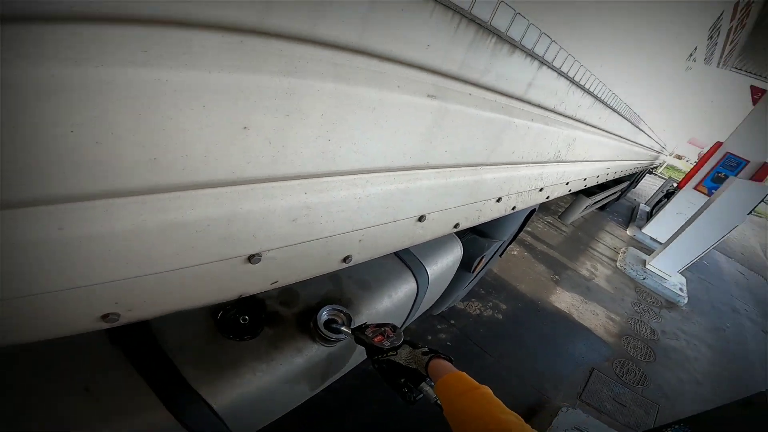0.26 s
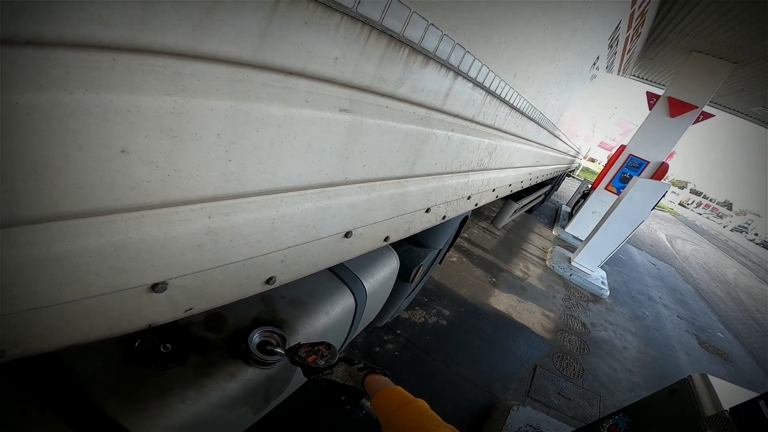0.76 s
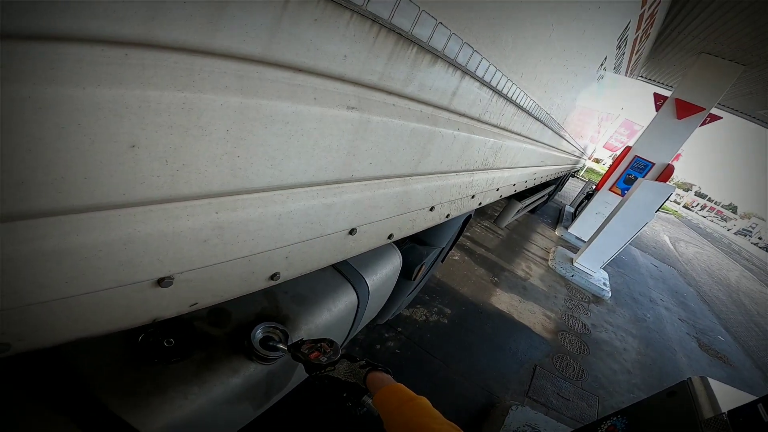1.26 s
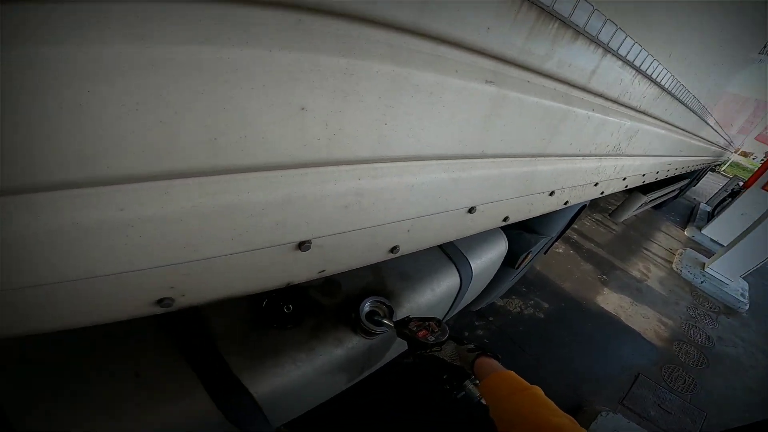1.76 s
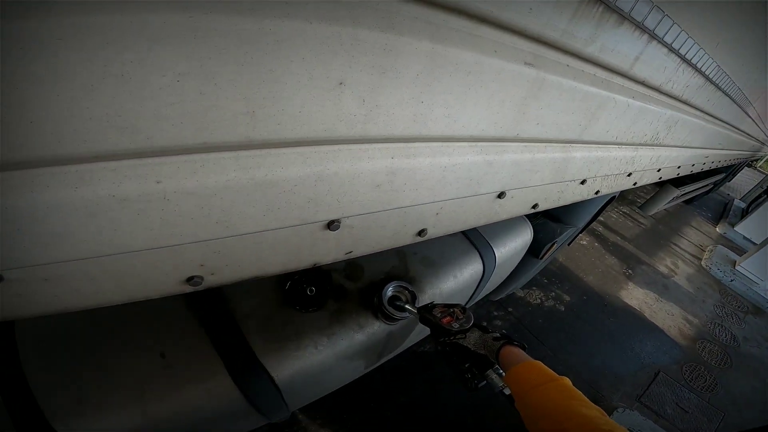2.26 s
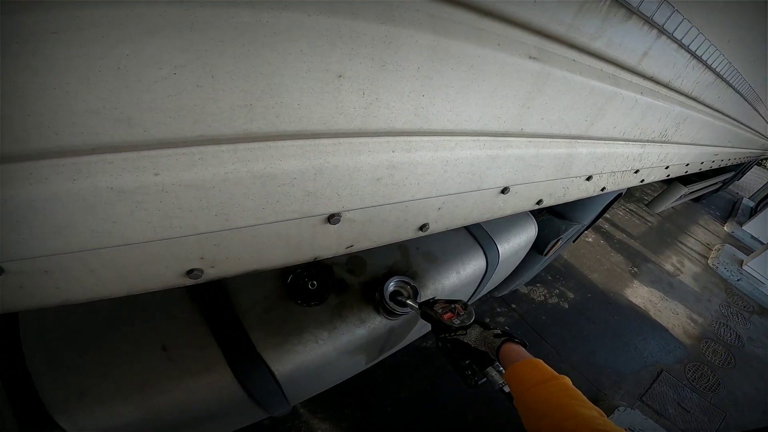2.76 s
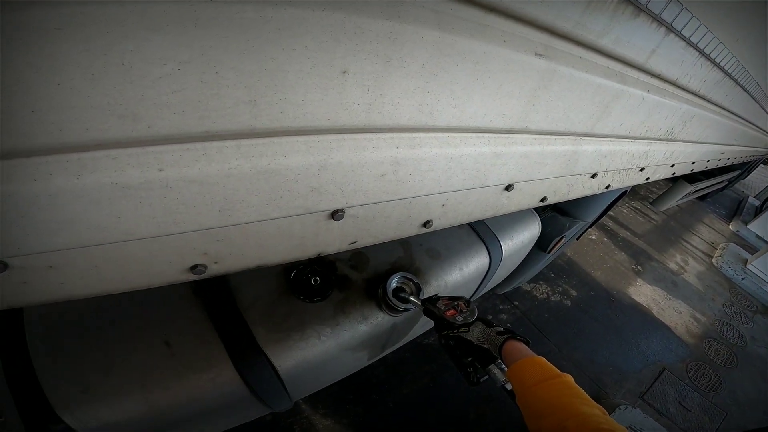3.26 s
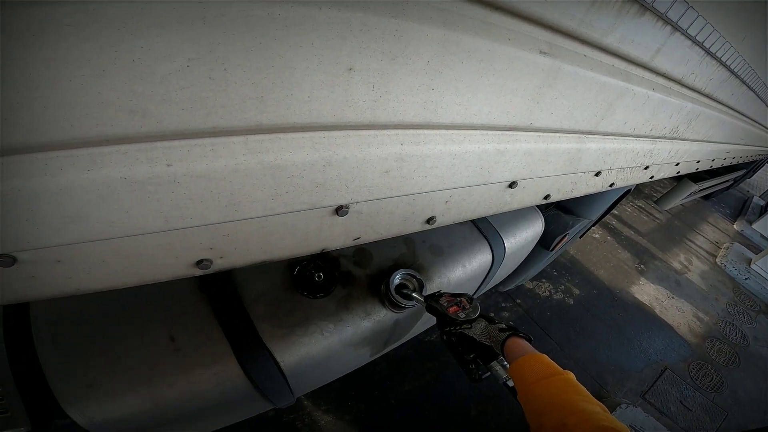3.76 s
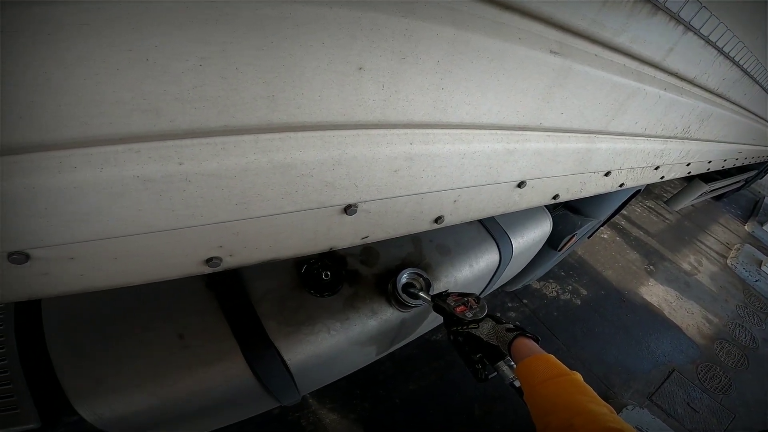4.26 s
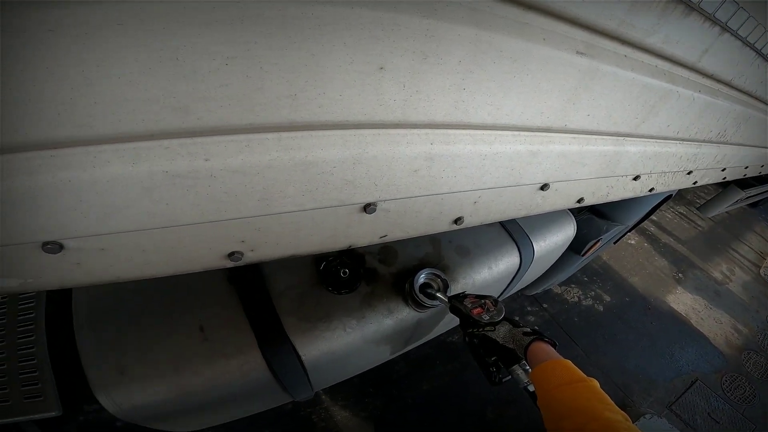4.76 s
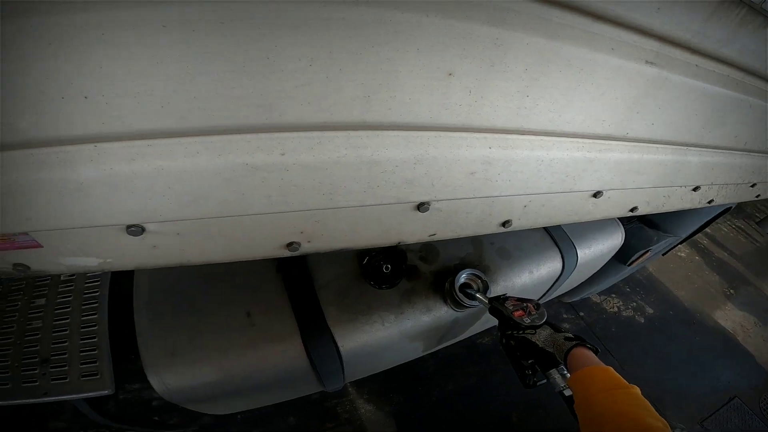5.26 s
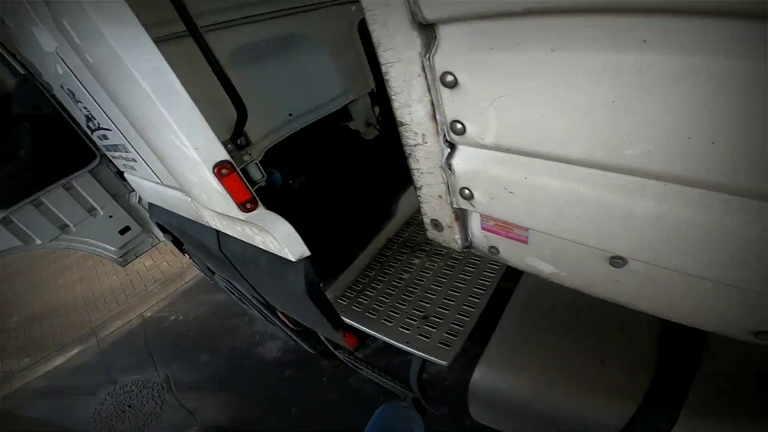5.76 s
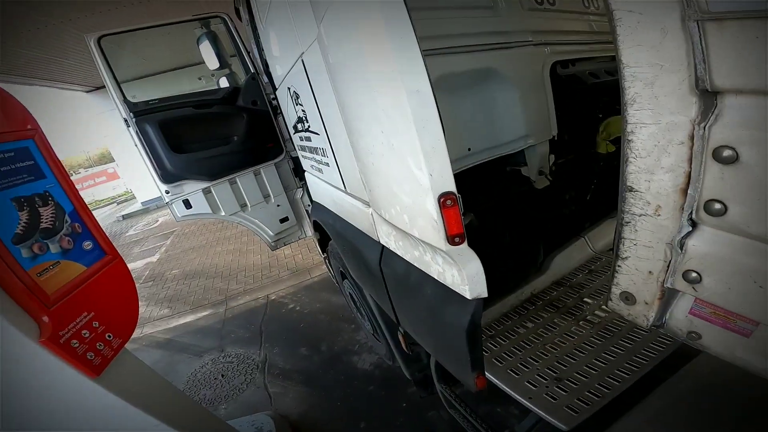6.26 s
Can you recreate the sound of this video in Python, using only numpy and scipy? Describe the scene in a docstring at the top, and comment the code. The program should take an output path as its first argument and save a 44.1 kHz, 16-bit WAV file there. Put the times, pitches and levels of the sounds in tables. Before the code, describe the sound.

Diesel rushes and fizzes steadily into a lorry's metal tank, spitting sharply, over a low pump hum and rumbling traffic, ending with a soft knock.

```python
"""Filling a lorry with diesel

Diesel runs from a nozzle into a lorry's tank at a roadside filling station: coloured noise makes the rush
and fizz, and ringing resonances the bubbles. Sharp droplet bursts spit through the resonant spout.
Steady sines hum for the pump motor and drone for an engine; noise bands rumble and swish as traffic, and
narrow ones whine. Gusts buffet the microphone and the nozzle ticks once. Near the end the listener turns
from the tank with a soft knock: the hiss sinks and the spray stays faint."""
import sys
import numpy as np
from scipy import signal
from scipy.io import wavfile

SR = 44100
rng = np.random.default_rng(int(sys.argv[2]) if len(sys.argv) > 2 else 0)


def unload_wav(signal):
    """Save mono or channel-first audio to the path in sys.argv[1] as 16-bit WAV at rate SR, clipped to [-1, 1]."""
    wavfile.write(
        sys.argv[1],
        SR,
        np.round(np.clip(np.atleast_2d(signal).T, -1, 1) * 32767).astype(np.int16),
    )


N = 286209
T = np.arange(N) / SR

# how openly the filler neck faces the listener [t/s, gain of the fizz/dB]
FACING = [(0.07, -2), (0.4, 2.5), (1.0, 0.5), (2.0, -1), (2.75, -0.7), (3.4, 1.5), (4.4, -1), (5.62, 0.4),
          (6.15, -8.5), (6.49, 0)]
# colour of the rushing jet, and of the foam [f/Hz, relative level per Hz/dB]
RUSH_COLOUR = [(1000, -6), (1350, -7.5), (1700, -5.5), (2100, -12), (2700, -9), (3300, -13), (4000, -16.5),
               (4700, -22), (6000, -21)]
FIZZ_COLOUR = [(4500, -3.5), (6000, -2), (7500, 0), (8300, -5.5), (9200, -10.5), (10000, -11),
               (11200, -11.5), (12100, -18), (13200, -16), (15000, -29)]
# filler neck resonances rung by the foam [f/Hz, width/Hz, level relative to the fizz/dB]
NECK_MODES = [(10050, 1100, -11.5), (12100, 700, -19.5)]
# level with the neck at its neutral facing (dB), and the share of the facing gain that is followed
RUSH_DB, RUSH_FOLLOWS = -47.5, 0.6
FIZZ_DB, FIZZ_FOLLOWS = -63, 1
# spray in the spout between spits [t/s, level/dB]
SPRAY_LEVEL = [(0, -59), (0.13, -62), (0.36, -53), (0.6, -54.5), (1.2, -56.5), (1.62, -55.5), (1.72, -61),
               (1.95, -60), (2.3, -61.5), (2.65, -58), (2.78, -62), (3.02, -56.5), (3.22, -61.5),
               (3.38, -59.5), (3.85, -60), (4.25, -55), (4.6, -61), (5.1, -56.5), (5.25, -60), (5.7, -63),
               (6.1, -76), (6.49, -74)]
# the strongest spits [t/s, level/dB, decay to 1/e/s]
SPITS = [(0.217, -49, .003), (0.387, -44.5, .008), (0.435, -46, 0.0045), (0.52, -52, .008),
         (0.576, -53, .004), (0.634, -46, 0.0041), (0.678, -50, 0.013), (0.765, -49, 0.0092),
         (0.797, -54, 0.0044), (0.863, -50, .008), (0.948, -56, .007), (0.969, -50, 0.0037),
         (1.02, -48, .004), (1.05, -52, .007), (1.19, -52.5, .008), (1.433, -55, .003),
         (1.451, -48, 0.0062), (1.6, -58, .012), (1.82, -59, .005), (1.997, -55, .005), (2.403, -53, .003),
         (2.615, -56, .012), (2.885, -54, 0.0049), (3.058, -49, .005), (3.153, -63, 0.0044),
         (3.322, -54, .005), (3.361, -49, 0.0065), (3.406, -42.5, 0.0045), (3.511, -48, .005),
         (3.871, -54, .004), (4.0, -55, 0.014), (4.2, -49, .005), (4.319, -58, .014), (4.582, -51, .004),
         (4.74, -51, .01), (4.93, -48, .007), (4.995, -51, .007), (5.133, -49, .011), (5.46, -57, 0.0036),
         (5.54, -54, 0.0047)]
SPIT_RISE_S = .002
# spout resonances [f/Hz, width/Hz, relative level/dB]
SPOUT_MODES = [(6160, 63, 1.5), (6320, 79, 4.5), (6620, 320, 0.5), (6730, 130, -3), (6960, 35, 1.5),
               (7010, 180, 1), (7360, 820, -16), (10300, 500, -13), (11800, 840, -6)]
# loudness of the pump's hum where the listener stands [t/s, level/dB]
HUM_LEVEL = [(0, -32), (0.35, -24), (0.6, -27.5), (0.95, -24.5), (1.25, -34), (1.7, -29.5), (3.0, -31),
             (4.5, -27), (5.2, -28), (6.1, -28), (6.49, -25)]
PUMP_HZ = 47.9  # mean shaft rate
# partials of the pump motor [multiple of the shaft rate, relative level/dB]
PUMP_ORDERS = [(1, 0), (2, -15.5), (5, -23), (7, -23)]
# a distant engine [t/s, f of its fifth order/Hz, level of the fifth/dB, level of the third/dB]
ENGINE = [(0, 123, -46, -28), (0.33, 119, -37, -44), (0.5, 124, -31, -25.5), (0.68, 117.5, -30.5, -49),
          (1.0, 118, -31.5, -34), (1.24, 113.5, -29, -27), (1.38, 114, -43, -46), (1.5, 115, -31.5, -45),
          (1.62, 115.5, -31.5, -35), (2.0, 114.5, -33, -39), (2.4, 113.3, -31.5, -31),
          (2.72, 115.5, -32, -36), (2.95, 121.5, -39.5, -42), (3.5, 130, -41.5, -49),
          (3.82, 136, -30.5, -35.5), (4.02, 136.5, -40, -41), (4.3, 137.3, -31.5, -40),
          (4.62, 136, -41, -41), (4.85, 136.5, -31, -42), (5.25, 134.5, -45, -41), (6.1, 132.5, -39, -33)]
# the traffic's low rumble, and the boom around the lorry [t/s, level/dB]
RUMBLE_LEVEL = [(0, -29.5), (0.9, -30), (2.0, -28.5), (3.5, -34), (4.4, -35.5), (4.95, -30.5), (5.5, -34.5),
                (6.49, -32.5)]
BOOM_LEVEL = [(0, -30.5), (0.9, -33), (2.5, -30), (2.8, -29), (3.9, -31.5), (4.6, -29), (5.15, -32.5),
              (6.49, -33)]
# colour of rumble, boom and tyre swish [f/Hz, relative level per Hz/dB]
RUMBLE_COLOUR = [(15, -7), (30, -2.5), (50, -1.5), (72, 0.5), (92, -9.5), (125, -5.5), (160, -17),
                 (250, -26)]
BOOM_COLOUR = [(90, -12.5), (140, -2), (170, -2), (205, -2), (250, -2), (290, -7.5), (350, -15),
               (450, -19.5), (700, -42)]
SWISH_COLOUR = [(250, -12), (400, -4.5), (520, -2.5), (610, -1.5), (680, -3.5), (800, 0.5), (1000, -3),
                (1250, -7.5), (1600, -12.5), (2400, -19.5)]
# distant tyres [t/s, swish level/dB, centre f of their song/Hz, song level/dB]
TYRES = [(0, -42.5, 757, -37.5), (0.45, -36.5, 820, -50), (1.1, -35, 1000, -48), (2.1, -37.5, 729.6, -47.5),
         (3.4, -38, 1002, -42), (3.8, -38.5, 1082, -45.5), (4.35, -39, 1270, -48), (5.3, -40, 1398, -47),
         (6.1, -43.5, 1392, -57), (6.49, -40, 1290, -43)]
# narrow whines, perhaps resonances of the tank or passing tyres
# [start t/s, end t/s, start f/Hz, end f/Hz, level/dB]
WHINES = [(0.303, 0.55, 1160, 1110, -44.5), (0.804, 1.379, 1100, 1028, -42.5),
          (1.145, 1.412, 958, 946, -48), (2.1, 2.45, 690, 685, -51), (3.199, 3.719, 1002, 965, -40),
          (3.93, 4.12, 1133, 1120, -45.5), (4.246, 4.42, 1280, 1306, -48)]
# how strongly the hollow under the trailer rings [t/s, level/dB]
HOLLOW_LEVEL = [(0, -50), (0.25, -42), (0.45, -39.5), (0.6, -39), (0.76, -38.5), (0.88, -38), (1.0, -35),
                (1.26, -33), (1.45, -40.5), (1.8, -45), (2.4, -46), (3.2, -47.5), (3.45, -41), (3.7, -49),
                (4.8, -44.5), (6.0, -48), (6.49, -48.5)]
# resonances of that hollow [f/Hz, width/Hz, relative level/dB]
HOLLOW_MODES = [(470.6, 55, -1), (553.2, 54, 2.5), (678, 38, 0.5), (825, 63, -9), (1110, 52, -16)]
# brief low tones [t/s, f/Hz, level/dB, half length/s]
SWELLS = [(0.034, 104.3, -24.5, 0.062), (0.365, 253.1, -31.5, 0.12), (1.23, 68.8, -28, 0.031),
          (1.453, 175, -31.5, 0.079), (1.54, 242.5, -26.5, 0.037), (2.057, 248.7, -30.5, 0.13),
          (2.73, 67, -26, 0.034), (2.797, 140, -36, 0.042), (2.81, 168.5, -28, 0.1),
          (2.983, 289.5, -35.5, 0.18), (3.274, 207, -27, 0.085), (3.43, 505, -39, 0.042),
          (3.625, 187, -32.5, 0.14), (4.348, 320, -36.5, 0.26), (4.487, 274, -31.5, 0.13),
          (5.08, 112, -26, 0.038), (5.715, 250, -34.5, 0.099), (5.74, 162, -29.5, 0.06)]
# gusts that brush the microphone [t/s, half length/s, level/dB, lift of the rumble/dB]
GUSTS = [(0.28, .12, -45, -2), (2.96, 0.065, -34, 0.5), (3.517, 0.087, -37, 2.5), (4.977, 0.33, -40, 0.5),
         (5.86, 0.046, -36, -4), (6.11, 0.022, -30, -10), (6.332, 0.082, -29, 8), (6.45, 0.083, -29, 3.5)]
# colour of the gusts [f/Hz, relative level per Hz/dB]
BUFFET_COLOUR = [(15, -4), (32, 7), (50, -3), (80, -7), (130, -13), (250, -13.5), (420, -14), (520, -15),
                 (700, -38)]
# the largest bubbles in the tank [t/s, f/Hz, level/dB]
PLOPS = [(0.46, 692, -26.5), (2.398, 710, -25.5), (4.802, 1325, -25), (5.164, 861, -31),
         (5.412, 1315, -24.5)]
# a tick of the nozzle against the filler neck [t/s, level/dB]
TICK = (2.3046, -46.5)
# ringing modes of the nozzle [f/Hz, level relative to the tick/dB, t60/s]
NOZZLE_MODES = [(850, 14, .02), (1830, 18, 0.009), (3890, -5, .015), (5350, 4.5, 0.027), (10000, -8, .04)]
# a soft hollow knock as the listener turns [t/s, level/dB]
KNOCK = (5.835, -27)
# ringing modes of the knocked panel [f/Hz, level relative to the knock/dB, t60/s]
PANEL_MODES = [(477, -3.5, 0.24), (515, 1.5, 0.11), (594, -6, .12)]
CUTOFF_HZ = 15400


def from_db(db):
    """Decibels to gain."""
    return 10 ** (np.asarray(db) / 20)


def rms_one(x):
    """Scale to rms 1."""
    return x / np.sqrt(np.mean(x ** 2) + 1e-20)


def in_time(rows):
    """Each column of a curve, drawn in straight lines to every sample."""
    s, *columns = np.transpose(rows)
    return [np.interp(T, s, c) for c in columns]


def bell(s, half_s):
    """A smooth rise and fall of height 1 about time s."""
    return np.exp(-((T - s) / half_s) ** 2)


def lowpass(x, order, hz):
    """Butterworth cut of the treble."""
    return signal.sosfilt(signal.butter(order, hz, fs=SR, output="sos"), x)


def bandpass(x, order, low_hz, high_hz):
    """Butterworth band."""
    return signal.sosfilt(signal.butter(order, [low_hz, high_hz], "band", fs=SR, output="sos"), x)


def drift(rate):
    """Smooth random wander of rms 1; rate in Hz."""
    step = 40  # computed at every 40th sample
    r = np.exp(-2 * np.pi * rate * step / SR)
    noise = rng.standard_normal(N // step + 2002)
    slow = signal.lfilter([1], [1, -2 * r, r * r], noise)[2000:]
    return np.interp(np.arange(N) / step, np.arange(len(slow)), rms_one(slow))


def resonate(x, hz, width_hz):
    """Two-pole resonance with gain about 1 at its peak."""
    r = np.exp(-np.pi * width_hz / SR)
    feed = np.array([1, 0, -1]) * (1 - r * r) / 2
    ring = [1, -2 * r * np.cos(2 * np.pi * hz / SR), r * r]
    return signal.lfilter(feed, ring, x + 1e-18)


def turbulence(colour, patchy_db, flicker_rate, count):
    """Noise in count bands, each flickering on its own; rms 1."""
    hz, db = np.transpose(colour)
    edges = np.geomspace(hz[0], min(hz[-1], SR * .45), count + 1)
    white = rng.standard_normal((2, N + SR // 2))  # neighbouring bands draw on different noise
    out = np.zeros(N)
    for k, (low, high) in enumerate(zip(edges, edges[1:])):
        band = bandpass(white[k % 2], 2, low, high)[-N:]
        level_db = np.interp(np.log(low * high) / 2, np.log(hz), db)
        out += band * from_db(level_db + patchy_db * drift(flicker_rate))
    return rms_one(out)


def narrow_noise(hz, width_hz):
    """Noise in a narrow band about a pitch that may move; rms 1."""
    phase = 2 * np.pi * np.cumsum(hz * np.ones(N)) / SR
    a, b = lowpass(rng.standard_normal((2, N)), 2, width_hz / 2)
    return rms_one(a * np.cos(phase) + b * np.sin(phase))


def droplets(per_s, spread_db):
    """Random tiny impacts of uneven size and either sign; rms 1."""
    sizes = from_db(spread_db * np.minimum(rng.exponential(1, N), 4))
    signs = rng.choice([-1, 1], N)
    return rms_one(sizes * signs * (rng.random(N) < per_s / SR))


def struck_modes(age, modes):
    """Decaying sines that start together at age 0."""
    return sum(from_db(db - 60 * age / t60) * np.sin(2 * np.pi * hz * age) for hz, db, t60 in modes)


def jet():
    """Fuel plunges into the tank: a broad rush with small bubbles, and fizzing foam that rings the neck."""
    [facing_db] = in_time(FACING)
    rush = turbulence(RUSH_COLOUR, patchy_db=1.23, flicker_rate=14.0, count=12)
    # each bubble rings for a few cycles; the small high ones are weaker
    bubbles = np.zeros(N)
    for hz in np.geomspace(1100, 3800, num=12):
        bubbles += resonate(droplets(per_s=300, spread_db=0.3), hz, hz / 14) / hz ** 1.5
    bubbles = lowpass(bubbles, 3, 4500)  # the liquid softens their onset
    fizz = turbulence(FIZZ_COLOUR, patchy_db=2.1, flicker_rate=30, count=16)
    fizz = fizz + sum(from_db(db) * narrow_noise(hz, width) for hz, width, db in NECK_MODES)
    flutter_db = 1.0 * drift(40)
    rush_gain = from_db(RUSH_DB + RUSH_FOLLOWS * facing_db)
    fizz_gain = from_db(FIZZ_DB + FIZZ_FOLLOWS * facing_db + flutter_db)
    return rush_gain * (rush + from_db(-8.0) * rms_one(bubbles)) + fizz_gain * fizz


def gurgle(level_db, low_hz, high_hz, cycles):
    """Larger bubbles burst now and then in the tank, each ringing briefly at one of 16 pitches."""
    [facing_db] = in_time(FACING)
    rings = np.zeros(N)
    for hz in np.geomspace(low_hz, high_hz, num=16):
        rings += resonate(droplets(per_s=2.2, spread_db=0.0), hz, hz / cycles)
    return from_db(level_db + RUSH_FOLLOWS * facing_db) * rms_one(rings)


def spout(clump_db, gulp_db, gulp_rate):
    """Air and droplets spit in slow gulps and quick clumps, and ring the spout's narrow resonances."""
    [spray_db] = in_time(SPRAY_LEVEL)
    bursts = rms_one(from_db(gulp_db * drift(gulp_rate) + clump_db * drift(84)))
    strength = from_db(spray_db) * bursts
    for s, db, fall_s in SPITS:
        age = T - s
        strength += from_db(db) * np.exp(np.minimum(age / SPIT_RISE_S, -age / fall_s))
    spray = droplets(per_s=8000, spread_db=3.0)
    # each resonance is fed by its own share of the spray
    dealt = rng.integers(0, len(SPOUT_MODES), N)
    rings = np.zeros(N)
    for k, (hz, width, db) in enumerate(SPOUT_MODES):
        rings += from_db(db) * resonate(spray * (dealt == k), hz, width)
    return strength * rms_one(bandpass(rings, 2, 5200, 9000))


def pump(waver_db, waver_rate):
    """The motor turns almost steadily; multiples of its shaft rate hum and waver a little."""
    [level_db] = in_time(HUM_LEVEL)
    phase = 2 * np.pi * np.cumsum(PUMP_HZ + 0.1795 * drift(1.62)) / SR
    hum = np.zeros(N)
    for k, db in PUMP_ORDERS:
        hum += from_db(db + waver_db * drift(waver_rate)) * np.sin(round(k) * phase)
    return from_db(level_db) * rms_one(hum)


def engine(rough_db, waver_hz, overtone_db):
    """One engine drones on the third, fifth and tenth multiples of its shaft rate, speeding up midway."""
    fifth_hz, fifth_db, third_db = in_time(ENGINE)
    shaft = 2 * np.pi * np.cumsum(fifth_hz + waver_hz * drift(10.2)) / SR / 5
    orders = [(3, third_db), (5, fifth_db), (10, fifth_db + overtone_db)]
    # root two gives each sine rms 1 before its level
    return sum(from_db(db + rough_db * drift(9.8)) * np.sqrt(2) * np.sin(k * shaft) for k, db in orders)


def street():
    """Flickering noise makes the low rumble, the boom around the lorry and the swish of tyres."""
    [rumble_db] = in_time(RUMBLE_LEVEL)
    [boom_db] = in_time(BOOM_LEVEL)
    swish_db, _, _ = in_time(TYRES)
    gust_db = sum(lift_db * bell(s, half_s) for s, half_s, _, lift_db in GUSTS)
    rumble = turbulence(RUMBLE_COLOUR, patchy_db=1.0, flicker_rate=6.7, count=9)
    boom = turbulence(BOOM_COLOUR, patchy_db=0.56, flicker_rate=4.0, count=14)
    swish = turbulence(SWISH_COLOUR, patchy_db=1.0, flicker_rate=3.0, count=20)
    return from_db(rumble_db + gust_db) * rumble + from_db(boom_db) * boom + from_db(swish_db) * swish


def tyre_song(width_hz):
    """Distant tyres sing in a broad band of noise whose centre moves."""
    _, song_hz, song_db = in_time(TYRES)
    return from_db(song_db) * narrow_noise(song_hz, width_hz)


def whines(width_hz, fade_s, hiss_hz, hiss_width_hz, hiss_db, hiss_half_s):
    """Narrow gliding whines, perhaps resonances of the tank or passing tyres, each amid a faint hiss."""
    out = np.zeros(N)
    hiss = narrow_noise(hiss_hz, hiss_width_hz)
    for start, end, start_hz, end_hz, db in WHINES:
        present = np.clip(1 + np.minimum(T - start, end - T) / fade_s, 0, 1)
        glide_hz = np.interp(T, [start, end], [start_hz, end_hz])
        out += from_db(db) * present * narrow_noise(glide_hz, width_hz)
        out += from_db(db + hiss_db) * bell((start + end) / 2, hiss_half_s) * hiss
    return out


def hollow():
    """Road noise rings the space between trailer and ground in narrow bands."""
    [level_db] = in_time(HOLLOW_LEVEL)
    rings = sum(from_db(db) * narrow_noise(hz, width) for hz, width, db in HOLLOW_MODES)
    return from_db(level_db) * rms_one(rings)


def swells(waver):
    """Brief low tones swell now and then, each at its own slightly wavering pitch (waver is a fraction)."""
    out = np.zeros(N)
    for s, hz, db, half_s in SWELLS:
        phase = 2 * np.pi * (np.cumsum(hz * (1 + waver * drift(17.9))) / SR + rng.random())
        out += from_db(db) * bell(s, half_s) * np.sin(phase)
    return out


def buffet():
    """Short gusts on the microphone: lumpy low noise that swells and fades."""
    breeze = sum(from_db(db) * bell(s, half_s) for s, half_s, db, _ in GUSTS)
    return breeze * turbulence(BUFFET_COLOUR, patchy_db=3.5, flicker_rate=10, count=11)


def plops(cycles, rise_s):
    """The largest bubbles: each swells quickly and falls 60 dB over the given count of cycles."""
    out = np.zeros(N)
    for s, hz, db in PLOPS:
        age = np.maximum(T - s, 0)
        swell = 1 - np.exp(-age / rise_s)
        out += from_db(db - 60 * age * hz / cycles) * swell * np.sin(2 * np.pi * hz * age)
    return out


def tick(crack_db, low_hz, high_hz):
    """The nozzle shifts once in the filler neck: one sharp click sets its metal ringing."""
    s, db = TICK
    rings = struck_modes(np.maximum(T - s, 0), NOZZLE_MODES)
    crack = bandpass(signal.unit_impulse(N, int(s * SR)) + 1e-18, 1, low_hz, high_hz)
    return lowpass(from_db(db) * (rings + from_db(crack_db) * crack), 10, 10600)


def knock(rise_s):
    """A soft bump sets a hollow panel ringing."""
    s, db = KNOCK
    age = np.maximum(T - s, 0)
    return from_db(db) * (1 - np.exp(-age / rise_s)) * struck_modes(age, PANEL_MODES)


def scene():
    """Everything heard from beside the tank."""
    fuel = jet() + gurgle(level_db=-51.5, low_hz=558.6, high_hz=1507, cycles=52)
    fuel = fuel + plops(cycles=57, rise_s=.003)
    spitting = spout(clump_db=2.5, gulp_db=2.3, gulp_rate=7.5)
    nozzle = tick(crack_db=33, low_hz=1400, high_hz=4300)
    filling = fuel + spitting + nozzle + pump(waver_db=1.0, waver_rate=15)
    whining = whines(width_hz=95, fade_s=0.059,
                     hiss_hz=2710, hiss_width_hz=1200, hiss_db=-21, hiss_half_s=0.9)
    traffic = engine(rough_db=1.77, waver_hz=.9, overtone_db=-14) + street() + tyre_song(width_hz=380)
    surroundings = traffic + whining + hollow() + swells(waver=0.02)
    return (filling + surroundings + knock(rise_s=.006) + buffet())[None]


def record(dry):
    """A steep elliptic filter cuts the top above CUTOFF_HZ."""
    return signal.sosfilt(signal.ellip(10, .1, 80, CUTOFF_HZ, fs=SR, output="sos"), dry)


dry = scene()
out = record(dry)
unload_wav(out)
```